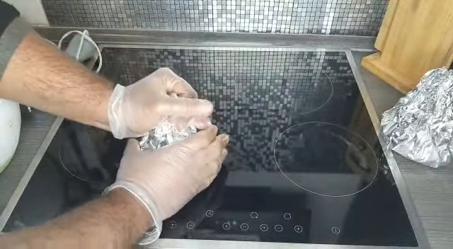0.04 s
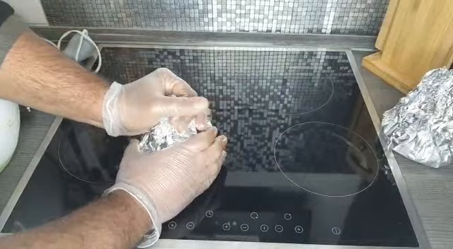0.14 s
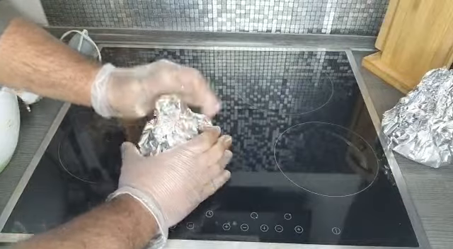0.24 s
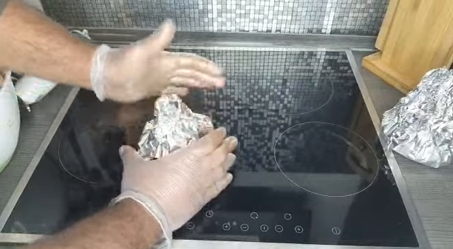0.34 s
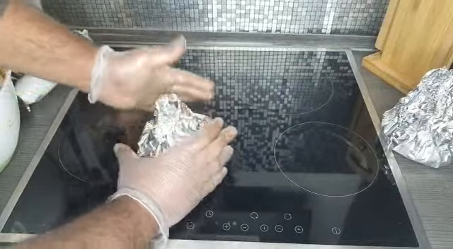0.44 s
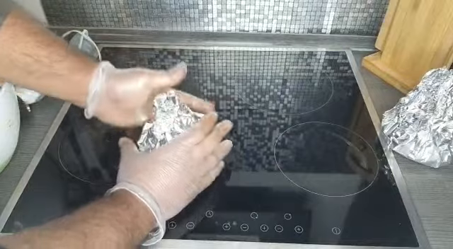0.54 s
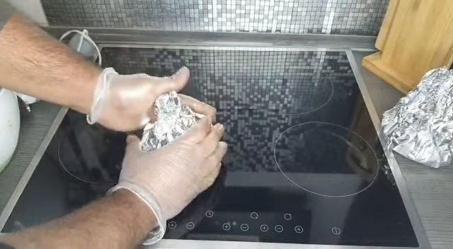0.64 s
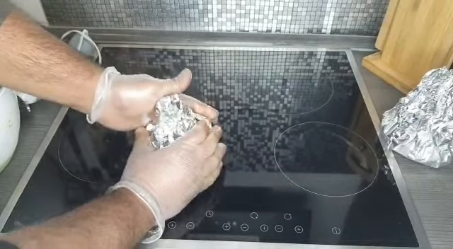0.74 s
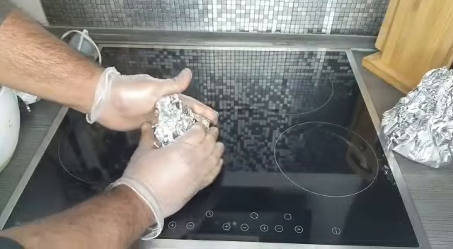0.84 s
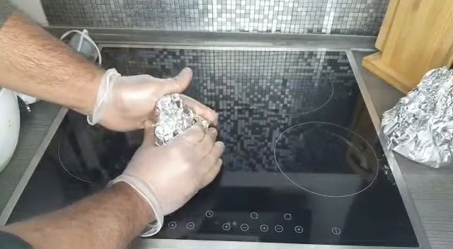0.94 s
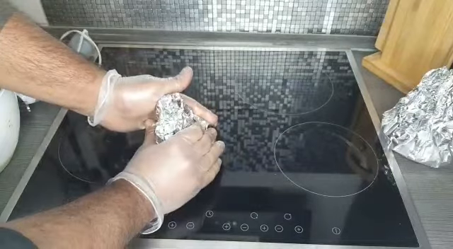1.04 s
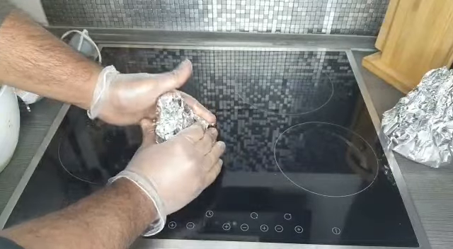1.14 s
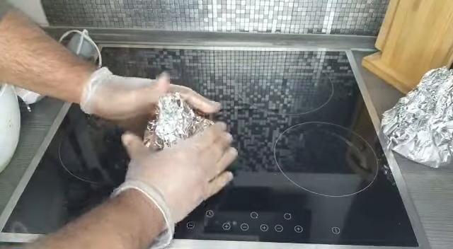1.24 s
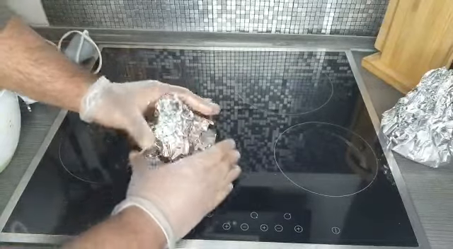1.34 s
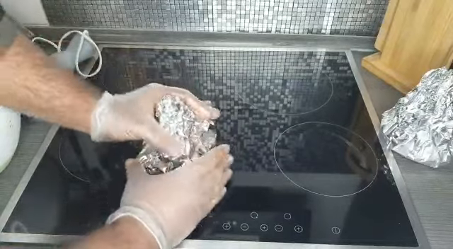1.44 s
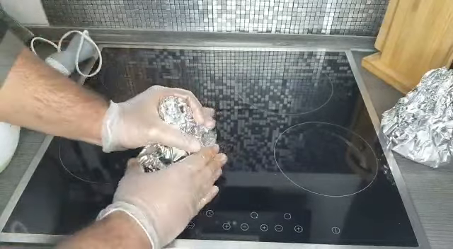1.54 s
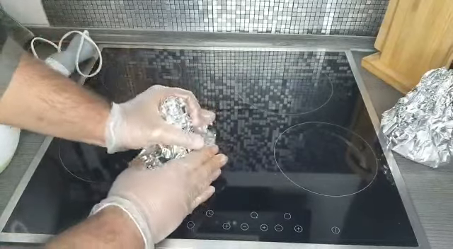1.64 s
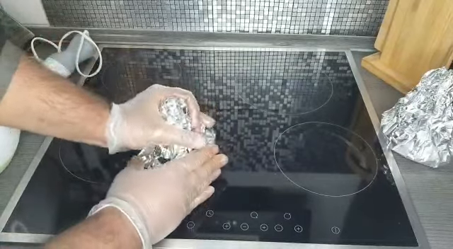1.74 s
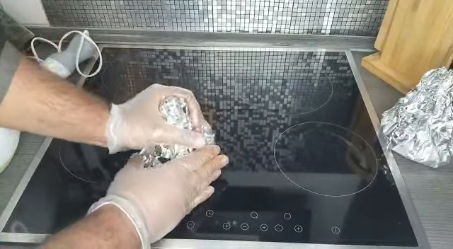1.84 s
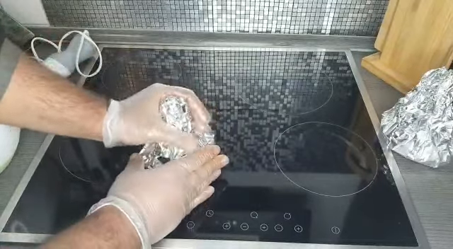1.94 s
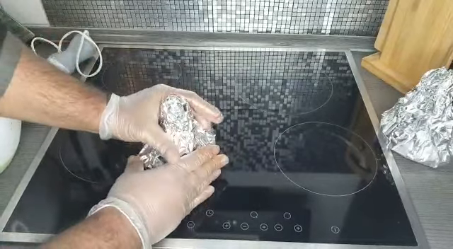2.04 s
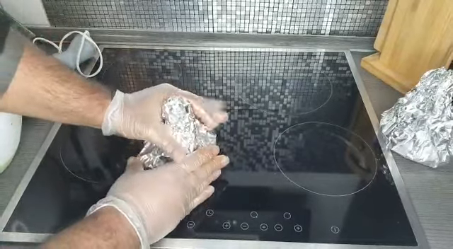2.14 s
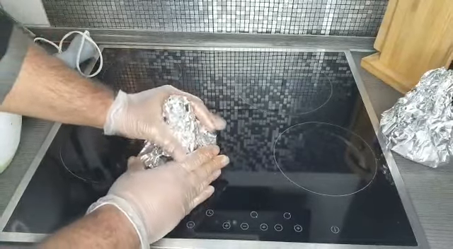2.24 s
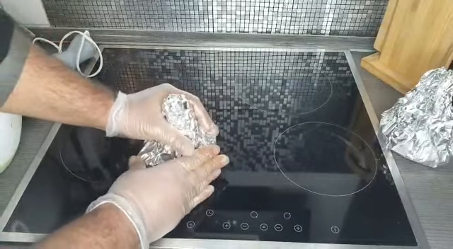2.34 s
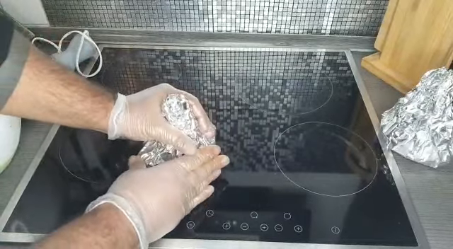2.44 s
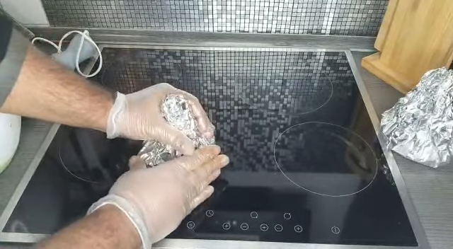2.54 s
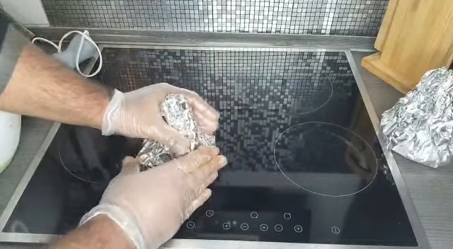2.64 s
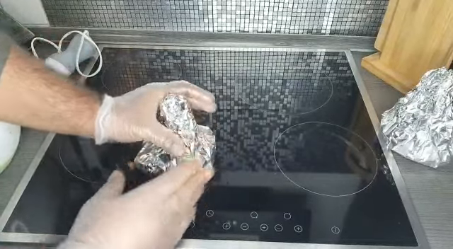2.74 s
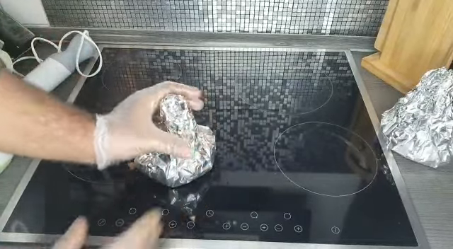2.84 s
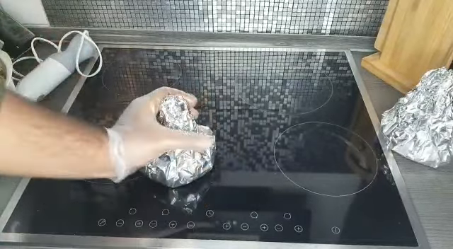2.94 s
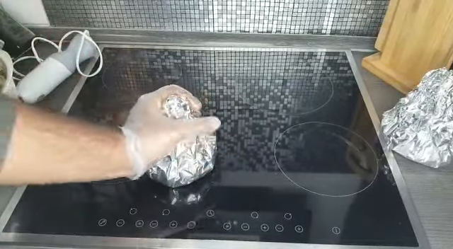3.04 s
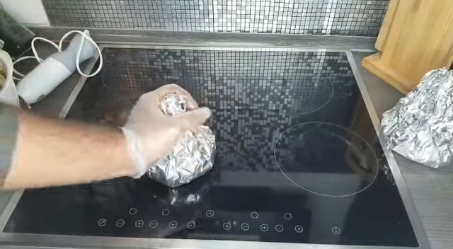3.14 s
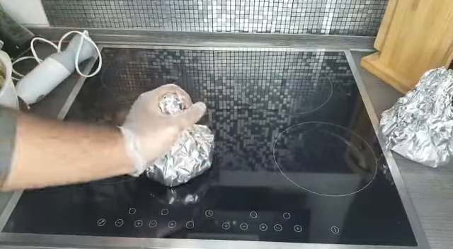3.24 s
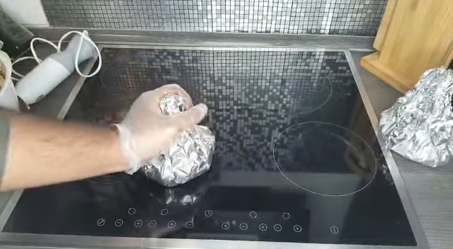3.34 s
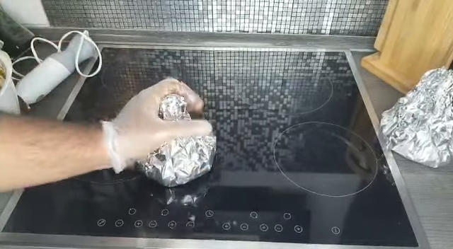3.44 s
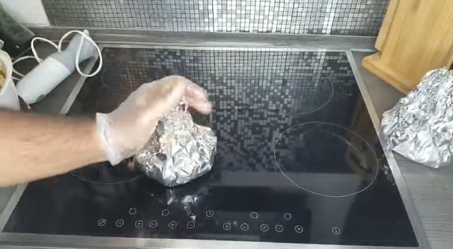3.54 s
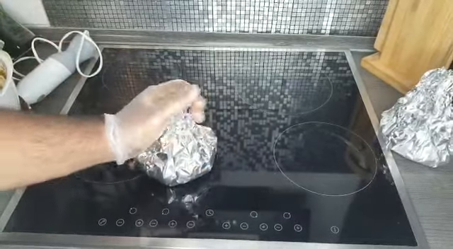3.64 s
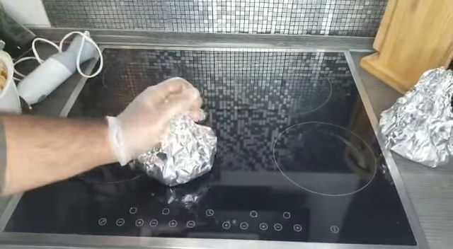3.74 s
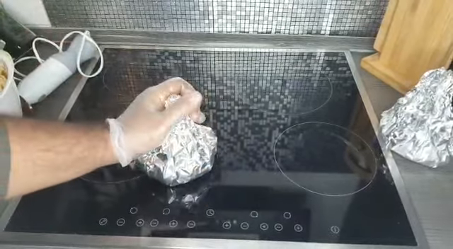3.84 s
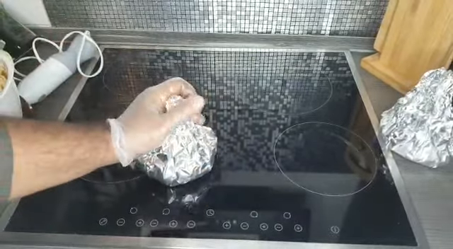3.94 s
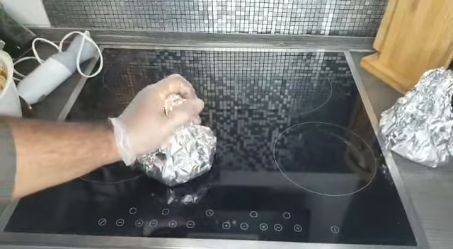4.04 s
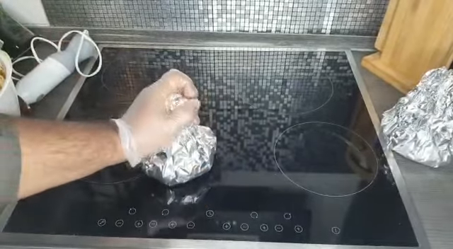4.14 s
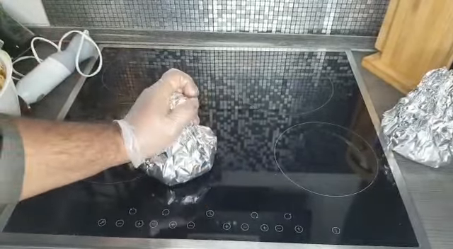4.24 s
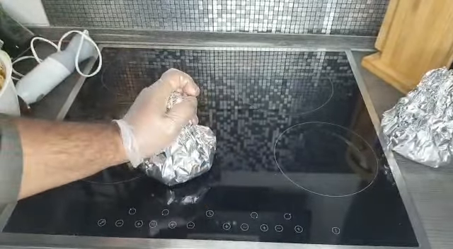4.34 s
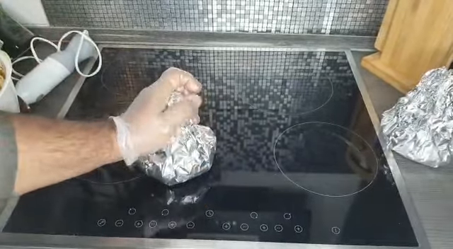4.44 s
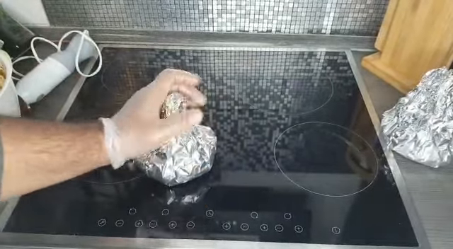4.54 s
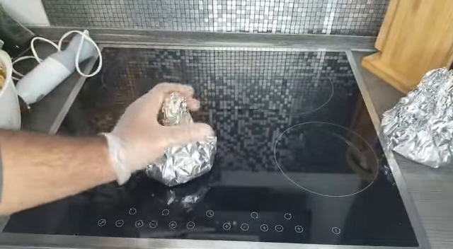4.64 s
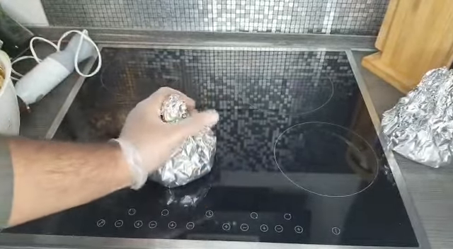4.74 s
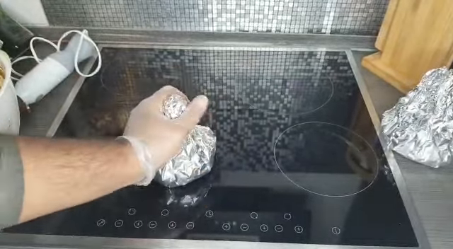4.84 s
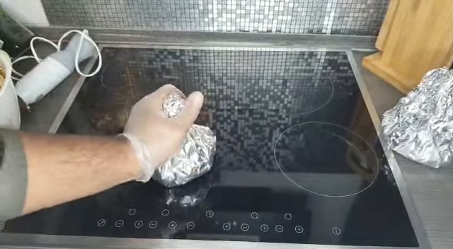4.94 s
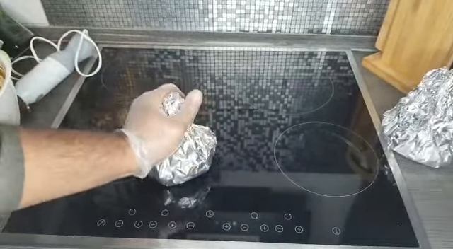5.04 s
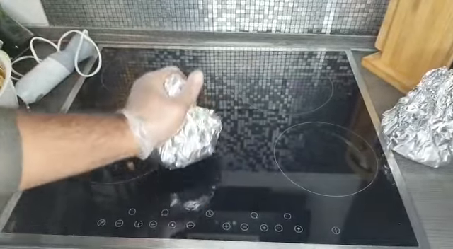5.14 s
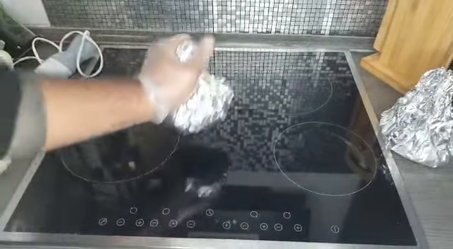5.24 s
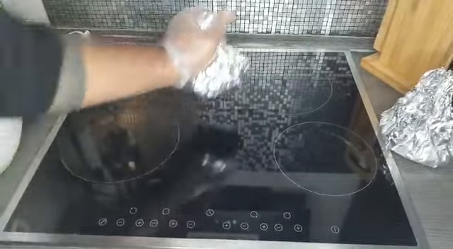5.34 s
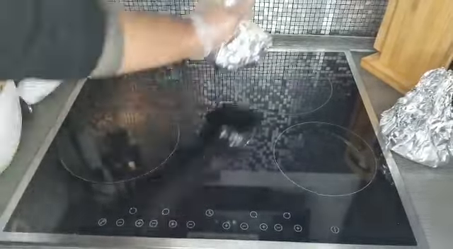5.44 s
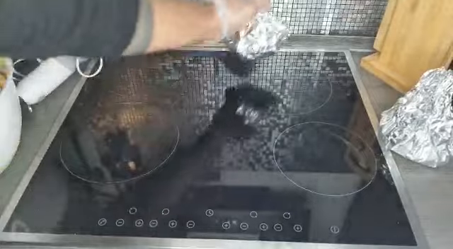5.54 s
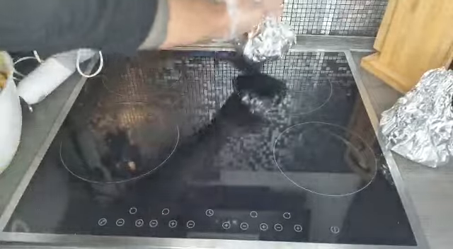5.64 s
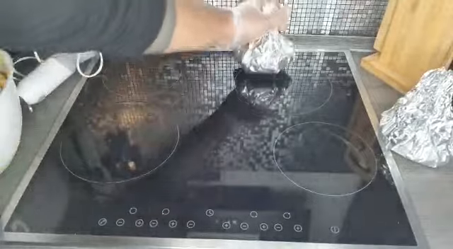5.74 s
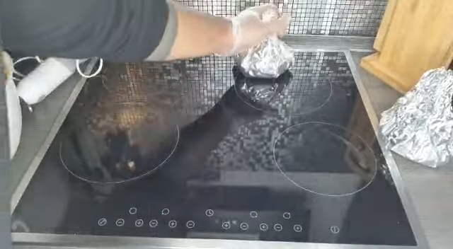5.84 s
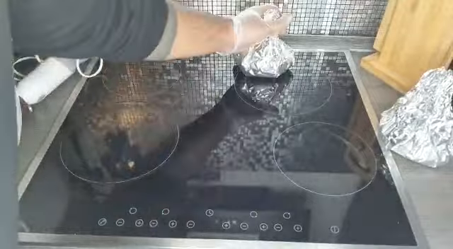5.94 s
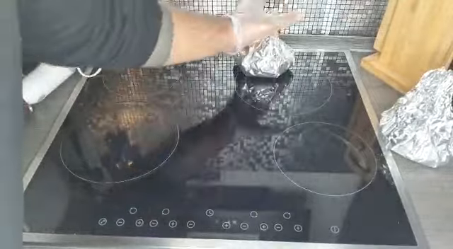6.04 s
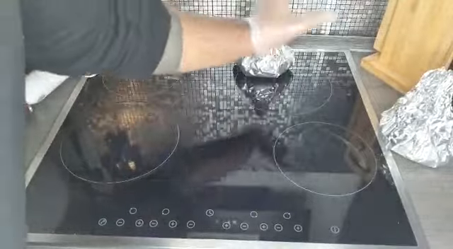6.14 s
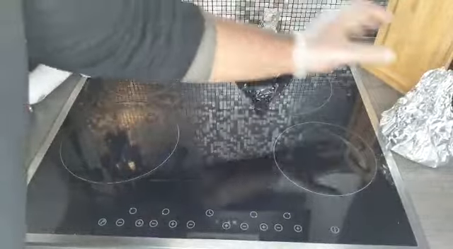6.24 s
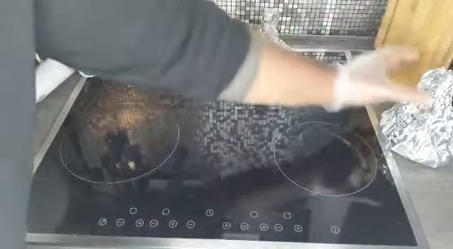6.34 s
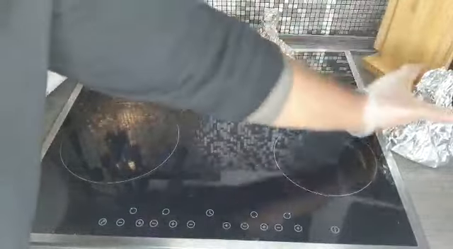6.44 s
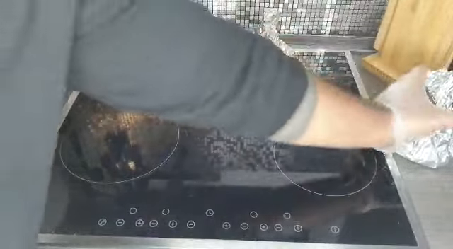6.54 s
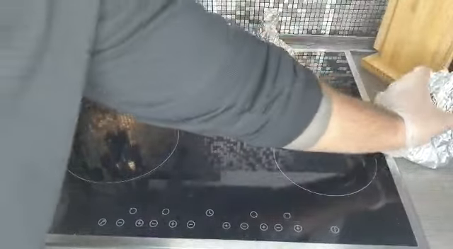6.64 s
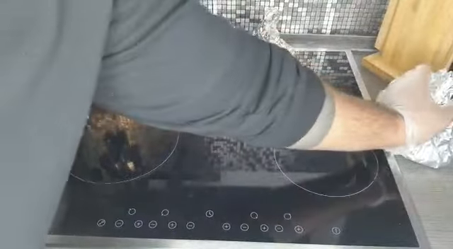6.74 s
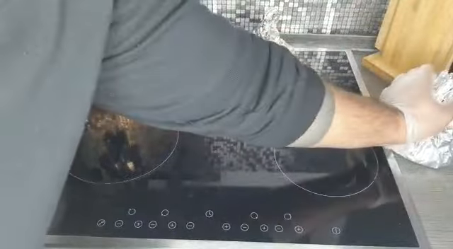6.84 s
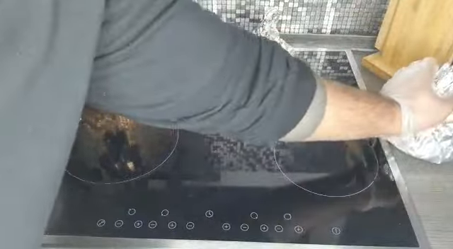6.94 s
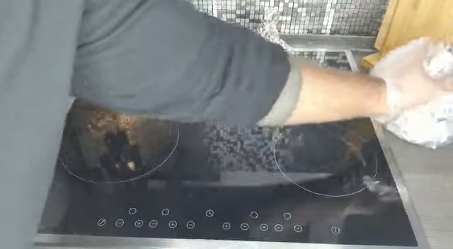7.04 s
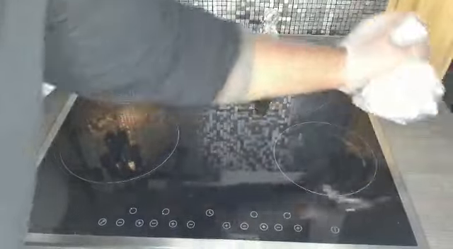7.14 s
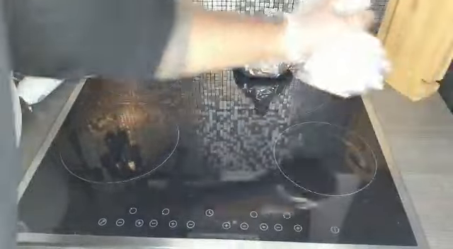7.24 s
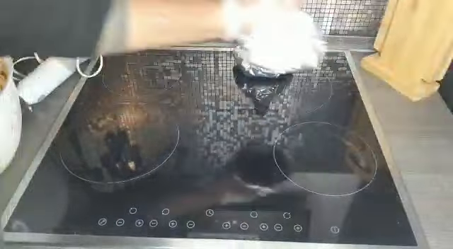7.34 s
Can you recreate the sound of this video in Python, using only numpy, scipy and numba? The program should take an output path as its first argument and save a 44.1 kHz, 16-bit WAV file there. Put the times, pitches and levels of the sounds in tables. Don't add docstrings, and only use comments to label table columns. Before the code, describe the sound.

Bright, crisp foil crackling in uneven bursts gradually thins out, a parcel thuds softly on a glass hob, and another parcel rustles.

```python
import sys
import numpy as np
from scipy import signal
from scipy.fft import rfft, irfft, next_fast_len
from scipy.io import wavfile
from scipy.ndimage import uniform_filter1d
from numba import njit

SR = 44100
rng = np.random.default_rng(int(sys.argv[2]) if len(sys.argv) > 2 else 0)


def materialize(psi):
    bounded = np.clip(np.atleast_2d(psi).T, -1, 1)
    quanta = np.round(bounded * 32767).astype(np.int16)
    wavfile.write(sys.argv[1], SR, quanta)


def natural_amplitude(level_db):
    exponent = np.asarray(level_db, float) / 20
    return 10 ** exponent


N = 325899

# (frequency [Hz], density [dB per Hz])
AIR_SPECTRUM = [(15, -49), (25, -15), (43, 6), (137, 1), (190, -8), (256, -2.5), (309, -0.5), (363, 0.5),
                (1200, -27), (2700, -32), (5000, -27.5), (12500, -20.5), (16000, -34)]
# (frequency [Hz], likeness [-1 to 1])
PORT_LIKENESS = [(60, 0.58), (300, 0.78), (700, 0.36), (1400, .05), (15000, .02)]
# (frequency [Hz], left minus right [dB])
PORT_TILT = [(60, -7.5), (300, -1.5), (650, -3.5), (1300, -3), (5000, -0.5), (10000, -3)]
# (frequency [Hz], t60 [s])
KITCHEN_T60 = [(100, 0.26), (500, 0.15), (1000, 0.14), (2000, 0.11), (8000, 0.13), (16000, 0.045)]
# (frequency [Hz], level [dB])
SHAKE_SPECTRUM = [(25, -27), (40, -14), (60, 7), (85, -1), (120, -2.5), (170, -11), (300, -21.5)]
# (fully on [s], hold [s], level [dB], letting go [dB per s])
LEANS = [(0.0, .3, -68.5, 23), (.65, 0.76, -63.5, 100), (1.64, 0.31, -65, 46), (1.96, 0.043, -58, 59),
         (2.41, 0.21, -63.5, 30), (3.32, 0.039, -54, 90), (3.47, 0.07, -67.5, 90), (3.82, 0.035, -69.5, 77),
         (4.12, 0.053, -61.5, 22), (5.15, 0.07, -57.5, 64.5), (5.34, 0.053, -73, 81),
         (6.15, 0.027, -87, 54.5), (6.7, 0.41, -69.5, 19)]
# (frequency [Hz], level [dB], t60 [s])
HOB_MODES = [(59.6, 6.5, 0.25), (84.7, 0, 0.33), (101.5, 2, 0.28), (122.5, 7.5, 0.13), (142.6, 5, .18),
             (159, -11, .18), (184, -5, 0.21),
             (273, -22, 0.19), (303, -7, 0.24), (316, -4, 0.22), (350, -19, .2), (388, -14, 0.33),
               (451, -15, 0.21), (490, -21, .25), (585, -17, 0.21), (630, -23, 0.27), (727, -7, 0.15),
               (800, -24, .25), (860, -25, .15), (1114, -29, .2)]
# (frequency [Hz], level [dB])
RATTLE_SPECTRUM = [(60, -15), (150, -2), (215, -15), (300, -9), (600, -12), (800, -15), (1000, -26),
                   (4000, -28), (15000, -34)]
# (time [s], level [dB], contact [ms])
BLOWS = [
    (5.8867, -29, 0.58),
    (5.8956, -24.5, 0.89),
    (5.942, -37.5, 4.3),
    (5.992, -45.5, 0.58),
]
# (frequency [Hz], density [dB per Hz])
FOIL_SPECTRUM = [(880, -55), (1500, -20), (2240, -1.5), (2550, 1), (6950, -2), (9490, -4), (12700, 1),
                 (15500, -2), (16000, -15), (16500, -61.5)]
# (frequency [Hz], level [dB])
FOLD_SPECTRUM = [(150, -56.5), (230, -18.5), (420, -8), (620, -9.5), (870, -1.5), (1050, -1), (1500, -1.5),
                 (2200, 1), (3200, -24.5)]
# (fully on [s], hold [s], small creases [dB], letting go [dB per s])
GRIPS = [(0.0, 0.0067, -26, 77), (.27, 0.055, -34, 286), (.59, .05, -57.5, 98), (.65, 0.022, -38, 200),
         (.72, 0.32, -32, 90), (1.25, 0.052, -38, 346), (1.56, .09, -50, 198), (1.66, 0.017, -32, 67),
         (1.79, 0.027, -31, 40), (2.07, 0.0098, -38, 187), (2.21, 0.034, -60, 117), (2.4, 0.13, -41.5, 75),
         (2.74, 0.061, -44, 179), (2.96, 0.12, -56, 97), (3.1, 0.19, -47.5, 100), (3.2, 0.051, -52, 138),
         (3.29, 0.083, -44, 229), (3.465, .03, -42, 202), (3.51, 0.009, -37.5, 258),
         (3.675, .05, -53.5, 153), (3.735, 0.025, -42.5, 116), (3.893, 0.007, -41.5, 324),
         (4.07, 0.32, -46, 90), (4.565, 0.026, -39, 238), (4.78, 0.17, -56, 97.5), (4.98, 0.14, -48, 55.5),
         (5.16, 0.076, -42.5, 175.5), (5.5, 0.085, -47, 163), (5.44, .04, -58, 100),
         (5.71, 0.13, -67.5, 51), (5.893, 0.026, -65, 250), (6.065, 0.032, -51, 200),
         (6.105, 0.012, -49.5, 302)]
# (fully on [s], hold [s], small creases [dB], letting go [dB per s])
REACHES = [
    (6.602, 0.099, -59.5, 100),
    (6.721, 0.099, -37, 100),
    (6.82, 0.23, -37.5, 175),
    (7.21, 0.039, -44.5, 110),
    (7.3, 0.097, -60.5, 100),
]
# (time [s], folds against small creases [dB], body of the fizz [dB])
SLACK = [(0.0, -10, .1), (.7, -10.5, -0.2), (1.35, -8.5, -0.5), (2.0, -13, -3), (2.5, -8, -1),
         (2.95, -16.5, 1.5), (3.12, -9.5, .1), (3.4, -13.5, -8), (3.8, -11.5, 3), (4.6, -13, -3),
         (4.8, -16, -3), (4.95, -13.5, -17), (5.3, -9.5, 5), (5.43, -36, -13), (5.56, -25, -2),
         (5.61, -12.5, -11), (6.7, -13, .1), (7.15, -7, -9), (7.39, -13.5, 6)]
# (time [s], peak [dB],
# brightness [dB])
SINGLE_CREASES = [(.3317, -24.5, 8), (.646, -24, 6), (.7085, -23, 6), (1.7009, -21, 15), (1.7879, -24.5, 13),
                  (1.8035, -29, 25.5), (1.8127, -16.5, 35), (2.414, -22.5, 15), (2.424, -22.5, 4),
                  (2.5019, -19.5, 17), (2.5741, -19, 10.5), (2.7438, -29.5, 17), (3.0726, -36.5, 33),
                  (3.2644, -23.5, 33), (3.287, -30, 12), (3.5, -27, 16), (3.779, -31, 25), (4.0683, -30, 25),
                  (4.1157, -26.5, 40), (4.178, -33, 29), (4.365, -26, 36), (4.3874, -31, 24), (4.514, -31.5, 10),
                  (4.5324, -27.5, 21), (4.789, -56, 33), (4.827, -32, 34), (4.9744, -29.5, 14), (5.0215, -25, 3.5),
                  (5.074, -30.5, 27), (5.1565, -25.5, 35),
                  (0.0, -19, -3), (0.1834, -19.5, 3), (0.267, -26, 30), (0.748, -30.5, 8), (0.9754, -18.5, 9.5),
          (1.063, -27, -1), (1.2486, -28.5, -5), (1.828, -21, 9), (1.918, -23, -7), (1.9471, -23, -22),
          (2.187, -27.5, 3), (2.2777, -36.5, -10), (2.4692, -25, 4), (2.593, -25, -15), (2.7227, -36, -2),
          (3.304, -28, 8), (3.343, -25, 8), (3.6667, -44.5, -2), (3.733, -35.5, 0), (3.802, -26.5, 5),
          (5.15, -28, 17), (5.2532, -28, 0), (5.271, -28.5, 7), (5.444, -53, -8), (5.479, -39.5, 3),
          (5.5803, -40.5, -7), (5.707, -47.5, -1), (6.1081, -34.5, -12),
                  (6.596, -55, 9), (6.643, -47, -26), (6.7027, -37, -10), (6.733, -34, 0), (6.7464, -28, 9),
                  (6.7848, -31.5, -11), (6.8194, -18.5, 21.5), (6.845, -26.5, 3), (6.8516, -20.5, 5.5),
                  (6.884, -21.5, -2.5), (6.98, -30, 18), (7.0267, -32, 15), (7.036, -27, 18),
                  (7.0654, -26.5, 6), (7.1454, -45.5, -14), (7.2102, -28.5, 20.5), (7.228, -31, -5.5),
                  (7.254, -28, 11), (7.3026, -38, 21), (7.322, -38, 25),
                  (0.8093, -23, 12), (0.948, -22, 7), (0.987, -30, 12), (1.6876, -25, 12), (2.3276, -37.5, -3),
          (2.383, -33, 16), (3.3574, -32, 12), (3.5184, -23.5, 13), (4.1904, -34.5, 15), (4.2662, -40, 15),
          (4.298, -32, 10), (4.5723, -36, 9), (4.9408, -40, 10), (4.9954, -46, 12), (5.42, -52, 10),
          (5.796, -63, 12), (5.907, -30.5, 15), (6.6112, -48, 7), (6.888, -26, 12), (6.9454, -30, 19),
          (7.2004, -35, 17), (7.308, -39, 19)]
# (time [s], peak [dB])
FURTHER_CREASES = [(0.8336, -23.5), (1.1593, -32), (1.2125, -46), (1.566, -58), (2.0307, -30.5), (2.2098, -34),
                   (2.3972, -47), (2.7947, -31), (3.2112, -30.5), (3.3773, -31.5), (3.435, -37), (3.462, -43),
                   (3.578, -33), (3.8599, -31), (4.417, -47), (4.4414, -33), (4.9868, -34), (5.085, -34),
                   (5.105, -34.5), (5.142, -40), (5.824, -56), (6.06, -43)]
# (time [s], peak [dB], fold
# pitch [Hz], fold level [dB])
POPS = [(.0232, -27.5, 2240, -20), (0.0537, -21.5, 1740, -10.5), (0.0993, -40.5, 893, 11.5),
        (0.1401, -24, 2820, -1.5), (0.276, -33, 2360, -12), (0.7125, -32, 806, 2.5), (.7799, -25, 1340, -2),
        (0.8217, -30, 2180, 2), (.858, -23, 2090, -9.5), (0.909, -21.5, 2160, -3.5),
        (0.9259, -19.5, 2320, -1.5), (0.9993, -32.5, 2300, 2.5), (1.0219, -27, 1640, 5),
        (1.032, -24.5, 1830, -8), (1.6619, -23, 1540, -7.5), (1.8727, -27, 1450, -4),
        (2.077, -19.5, 1350, -3.5), (2.1483, -36.5, 2060, 3.5), (2.221, -28.5, 870, 0.5),
        (2.3473, -32.5, 1300, -9), (2.7796, -29.5, 1280, 0.5), (3.215, -27, 2200, -12.5),
        (3.892, -36, 2520, 0.5), (4.091, -42.5, 2370, -1.5), (4.64, -33.5, 2500, -2.5),
        (5.3564, -43.5, 2140, -11), (5.504, -30, 2700, -31), (3.324, -28.5, 2700, -15),
        (7.3624, -31.5, 2500, -21), (5.8894, -35, 727, -0.5), (6.721, -37, 2400, -8),
        (6.9701, -31.5, 1220, 1), (7.335, -31.5, 2010, -2)]
# (time [s], peak [dB], fold pitch [Hz])
DENTS = [(0.127, -29, 1290), (0.279, -37.5, 2320), (0.659, -35, 1370), (0.848, -31, 850),
         (0.989, -22, 2260), (1.122, -35, 2550), (1.184, -36, 2230), (1.213, -33.5, 2160),
         (1.227, -39, 2160), (1.304, -36.5, 875), (1.316, -37.5, 867), (1.566, -39, 1350),
         (1.623, -37, 2480), (1.721, -32.5, 864), (1.818, -29.5, 2050), (1.977, -40.5, 2600),
         (2.124, -34, 1310), (2.329, -42, 864), (2.358, -38.5, 2160), (2.542, -37.5, 900),
         (3.132, -44, 2300), (3.218, -32, 2180), (3.399, -42, 970), (3.48, -42, 2320), (3.519, -35, 1600),
         (4.062, -59.5, 2440), (4.604, -46.5, 1340), (4.766, -64, 1110), (5.215, -34, 2190),
         (5.237, -40, 1360), (5.32, -43, 2500), (5.544, -52, 1840), (5.589, -51, 1200), (6.101, -49, 1583),
         (6.706, -44, 2410), (6.918, -37, 1110), (6.957, -27.5, 1570), (7.117, -44, 2300),
         (7.26, -37.5, 2000)]


def evened(x):
    return x / np.sqrt(np.mean(x ** 2) + 1e-20)


def read(points, hz):
    f, value = np.transpose(points)
    return np.interp(np.log(hz + 1), np.log(f + 1), value)


def curve(rows, column):
    rows = np.array(rows)
    return np.interp(np.arange(N) / SR, rows[:, 0], rows[:, column])


def add(mix, s, sound):
    part = mix[:, max(round(s * SR), 0):][:, :sound.shape[1]]
    part += sound[:, :part.shape[1]]


def colour(x, points):
    gain_db = read(points, abs(np.fft.fftfreq(8192, 1 / SR)))
    log_gain = np.log(natural_amplitude(np.maximum(gain_db, -100)))
    taps = np.fft.ifft(np.exp(np.conj(signal.hilbert(log_gain)))).real[:4096]
    return signal.oaconvolve(x, taps[None], axes=1)[:, :x.shape[1]]


def noise(points):
    size = next_fast_len(N)
    hz = np.fft.rfftfreq(size, 1 / SR)
    a, b = rfft(rng.standard_normal((2, size)))
    same = np.clip(read(PORT_LIKENESS, hz), -1, 1)
    both = np.array([a, same * a + np.sqrt(1 - same ** 2) * b])
    return evened(irfft(both * natural_amplitude(read(points, hz)), size)[:, :N])


def ports(common, own, share):
    share = np.clip(share, 0, 1)
    right_lag = 4
    return share * np.array([common, np.roll(common, right_lag)]) + np.sqrt(1 - share ** 2) * own


def efforts(rows, rise_db_per_s, settle_db, rest_db):
    t = np.arange(0, N / SR + .002, .001)
    s, hold, db, fall = np.transpose(rows)[:, :, None]
    before, after = np.maximum(s - t, 0), np.maximum(t - s - hold, 0)
    settling = natural_amplitude(settle_db - 78 * after)
    level = natural_amplitude(db - rise_db_per_s * before) * (natural_amplitude(-fall * after) + settling)
    return np.interp(np.arange(N) / SR, t, np.sqrt((level ** 2).sum(0) + natural_amplitude(rest_db) ** 2))


def air():
    return natural_amplitude(-72.5) * noise(AIR_SPECTRUM)


def kitchen_echo(x):
    out = np.zeros((2, N))
    slots = np.arange(80, SR // 4 - 20, 20)
    for k in range(3):
        taps = np.zeros((2, SR // 4))
        places = slots + rng.integers(0, 20, (2, len(slots)))
        np.put_along_axis(taps, places, rng.choice([-1., 1.], (2, len(slots))), 1)
        hz, t, z = signal.stft(taps, SR, nperseg=256)
        decay = natural_amplitude(-60 * t / read(KITCHEN_T60, hz)[:, None])
        tail = signal.istft(z * decay, SR, nperseg=256)[1]
        tail = tail / np.linalg.norm(tail, axis=1)[:, None]
        turn = np.sqrt(2 / 3) * np.cos(2 * np.pi * (3 * np.arange(N) / SR + k / 3))
        out += signal.oaconvolve(x * turn, tail, axes=1)[:, :N]
    return out


def shake():
    press = efforts(LEANS, rise_db_per_s=206, settle_db=-61, rest_db=-82.5)
    return natural_amplitude(2.5) * press * noise(SHAKE_SPECTRUM)


def thump():
    t, out = np.arange(SR // 2) / SR, np.zeros((2, N))
    ring = np.zeros(len(t))
    for hz, db, t60 in HOB_MODES:
        swell = 1 - np.exp(-t * hz / 0.44)
        ring += natural_amplitude(db - 60 * t / t60) * swell * np.sin(2 * np.pi * hz * t)
    buzz = noise(RATTLE_SPECTRUM)
    buzz_shape = natural_amplitude(-12.5 - 60 * t / 0.25) * (1 - np.exp(-t / 0.0018))
    for s, db, ms in BLOWS:
        push = np.exp(-t[:2000] * 1000 / ms) * t[:2000]
        add(out, s, natural_amplitude(db) * np.convolve(ring, push / push.sum()) * natural_amplitude([[1.1], [-1.1]]))
        add(out, s, natural_amplitude(db) * buzz_shape * buzz[:, round(s * SR):][:, :len(t)])
    return out


def ping(hz, cycles, phase, size):
    t = np.arange(size) / SR
    return np.exp(-t * hz / cycles) * np.sin(2 * np.pi * (hz * t + phase))


@njit
def scatter(at, size, kind, shapes, length):
    out = np.zeros((2, length))
    for i in range(len(at)):
        for side in range(2):
            for n in range(shapes.shape[2]):
                out[side, at[i] + n] += size[i] * shapes[kind[i], side, n]
    return out


def grains(per_s, spread_db, lo_hz, hi_hz, cycles, smear_s, clump_s, share, count):
    clump = natural_amplitude(2.3 * evened(uniform_filter1d(rng.standard_normal(N), round(clump_s * SR))))
    happens = rng.random(N) < per_s / SR
    size = natural_amplitude(spread_db * np.minimum(rng.exponential(1, N), 4)) * happens * clump
    kind, shapes = rng.integers(0, count, N), []
    for _ in range(count):
        pitches = lo_hz * (hi_hz / lo_hz) ** rng.random(7)
        late = np.round(smear_s * SR * rng.random((3, 7))).astype(int)
        paths = [sum(np.roll(ping(f, cycles, 0, size=900), n) * f for f, n in zip(pitches, path))
                 for path in late]
        shapes.append(ports(paths[0], np.array(paths[1:]), share))
    at = np.flatnonzero(size)
    return scatter(at, size[at], kind[at], np.array(shapes), N + SR)[:, :N]


def crackle():
    fine = grains(1700, 1.3, 1703, 16170, 1.87, smear_s=.0015, clump_s=.012, share=0.35, count=30)
    folds = grains(900, 2.27, 299.0, 2920, 1.58, smear_s=.00315, clump_s=.012, share=0.74, count=20)
    spits = grains(200, 3.2, 4000, 21000, 3.5, smear_s=.0012, clump_s=.011, share=0.85, count=12)
    fine, spits = evened(colour(fine, FOIL_SPECTRUM)), evened(colour(spits, FOIL_SPECTRUM))
    folds = evened(colour(folds, FOLD_SPECTRUM))
    body = signal.sosfilt(signal.butter(2, 4500, fs=SR, output="sos"), fine)
    fine = fine + (natural_amplitude(curve(SLACK, 2)) - 1) * body
    squeeze = efforts(GRIPS + REACHES, rise_db_per_s=701, settle_db=-22, rest_db=-86)
    return squeeze * (natural_amplitude(-3.5) * fine + natural_amplitude(-19.5) * spits + natural_amplitude(curve(SLACK, 1) - 2.3) * folds)


def creases():
    rows = [(s, db, -3, hz, fold_db) for s, db, hz, fold_db in POPS]
    dent_fold_db, dent_trim_db = 2, -2.5
    rows += [(s, db - dent_fold_db + dent_trim_db, -14.5, hz, dent_fold_db) for s, db, hz in DENTS]
    plain = SINGLE_CREASES + [(s, db, 4) for s, db in FURTHER_CREASES]
    lo_hz, hi_hz = 1175, 2670
    for (s, db, bright_db), u in zip(plain, rng.random(len(plain))):
        fold_db = -15.5 - 0.24 * bright_db
        rows.append((s, db, bright_db, lo_hz * (hi_hz / lo_hz) ** u, fold_db))
    return rows


def facet(x, place):
    lo_hz, hi_hz, width_hz = 2500, 13350, 1100
    hz = lo_hz * (hi_hz / lo_hz) ** place
    resonance = signal.lfilter(*signal.iirpeak(hz, hz / width_hz, SR), x)
    return evened(x + natural_amplitude(-3) * evened(resonance))


def snaps():
    dull, bright, crunch, rings = 1e-15 * rng.standard_normal((4, 2, N))
    t = np.arange(1500) / SR
    rise_s, run_s, tail, tail_s = .0006, .002, .26, .008
    rows = creases()
    draws = rng.standard_normal((len(rows), 4, 1500))
    for (s, db, bright_db, hz, fold_db), draw, place in zip(rows, draws, rng.random(len(rows))):
        s = s - rise_s
        lean = natural_amplitude(bright_db + 1.0)
        ragged = natural_amplitude(3.2 * evened(uniform_filter1d(draw[3], 25)))
        fall = np.exp(-t * lean ** 0.2 / run_s) + tail * np.exp(-t * lean ** 0.16 / tail_s)
        shape = ragged * (1 - np.exp(-t / rise_s)) ** 2 * fall
        shape = shape / uniform_filter1d(shape, 44).max()
        ticks = natural_amplitude(db + 2.5) * facet(ports(draw[0], draw[1:3], 0.58), place) * shape
        add(dull, s, ticks / np.sqrt(0.71 + 2.0 * lean ** 2))
        add(bright, s, ticks * lean / np.sqrt(0.38 + 2.26 * lean ** 2))
        add(crunch, s, natural_amplitude(fold_db + 4.0) * ticks)
        ring = [ping(hz, 4.5, phase, size=1500) for phase in draw[:3, 0]]
        ring = (1 - np.exp(-t / 0.00049)) * ports(ring[0], np.array(ring[1:]), 1.0)
        add(rings, s, natural_amplitude(db + fold_db) * ring)
    low, high = (signal.butter(2, 6400, kind, fs=SR, output="sos") for kind in ("low", "high"))
    ticking = signal.sosfilt(low, dull) - signal.sosfilt(high, bright)
    return colour(ticking, FOIL_SPECTRUM) + colour(crunch, FOLD_SPECTRUM) + rings


def scene():
    foil = crackle() + snaps()
    move, left_lag = round(6.4 * SR), 12
    foil[0, move:] = np.roll(foil[0], left_lag)[move:]
    return foil + natural_amplitude(-4.5) * kitchen_echo(foil) + thump() + shake() + air()


def roll_off(x):
    return signal.sosfilt(signal.butter(12, 16620, fs=SR, output="sos"), x)


def record(dry):
    size = next_fast_len(N)
    hz = np.fft.rfftfreq(size, 1 / SR)
    tilt_db = read(PORT_TILT, hz) / 2
    top = 1 / (1 + (hz / 16000) ** 80)
    dry = signal.sosfilt(signal.butter(3, 48, "high", fs=SR, output="sos"), dry)
    mix = irfft(rfft(dry, size) * top * natural_amplitude(np.array([tilt_db, -tilt_db])), size)[:, :N]
    return roll_off(mix)


dry = scene()
out = record(dry)
materialize(out)
```